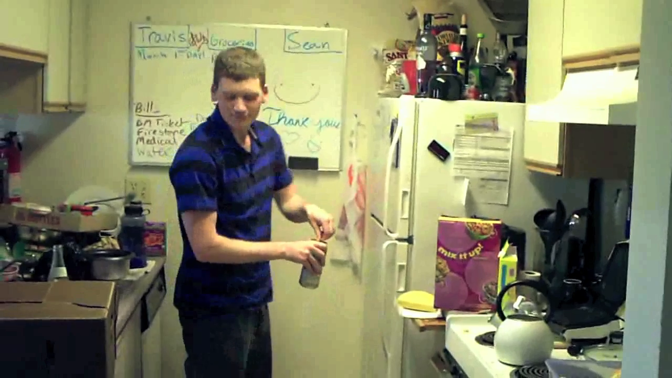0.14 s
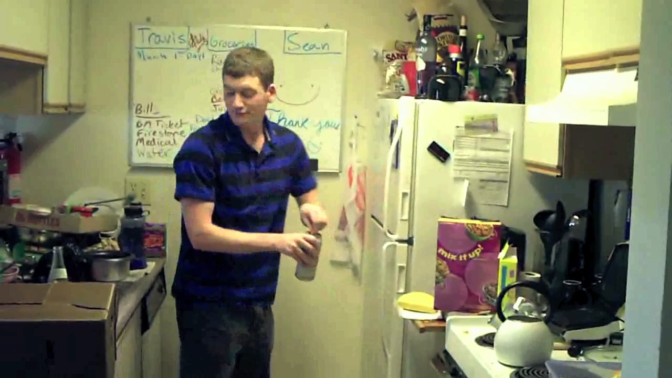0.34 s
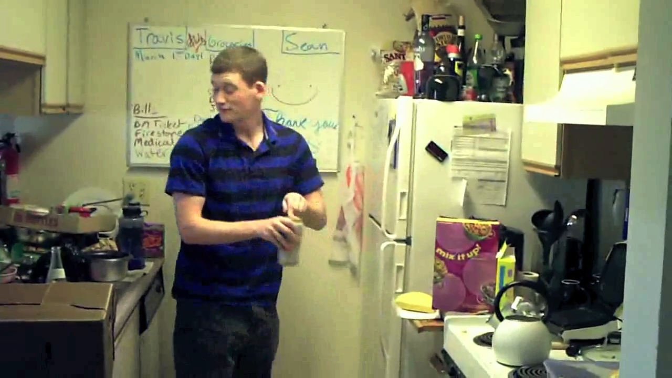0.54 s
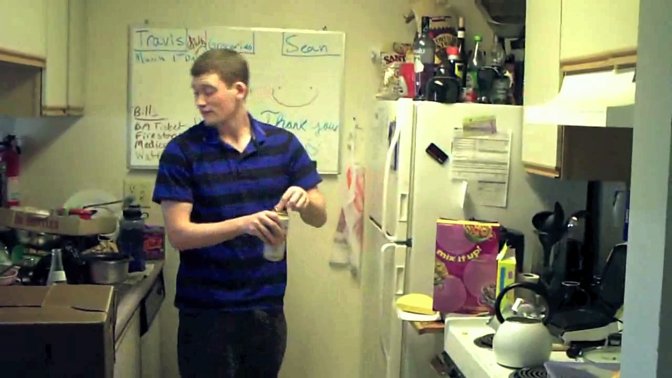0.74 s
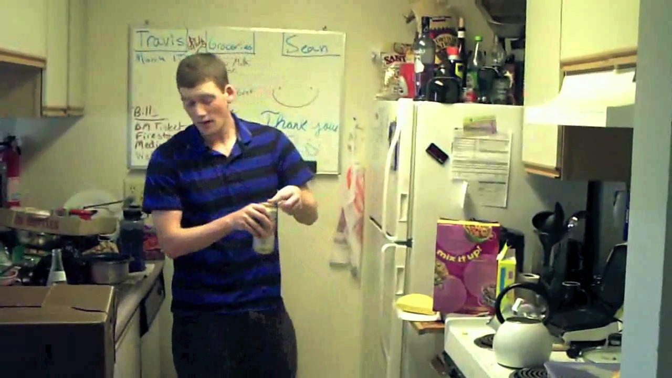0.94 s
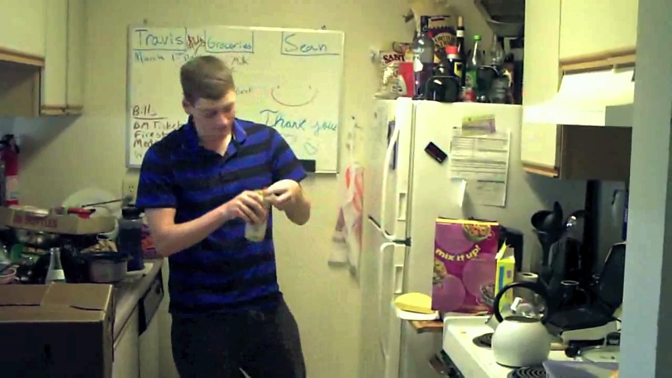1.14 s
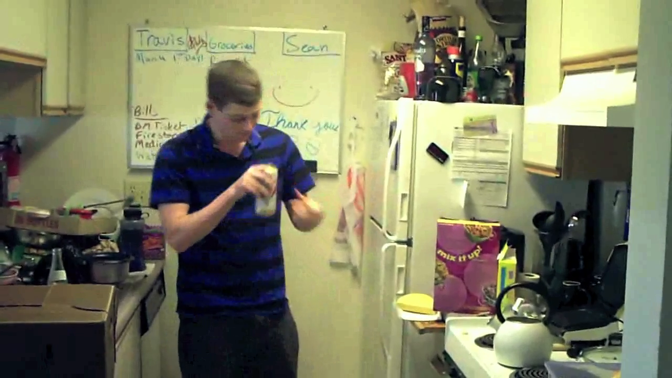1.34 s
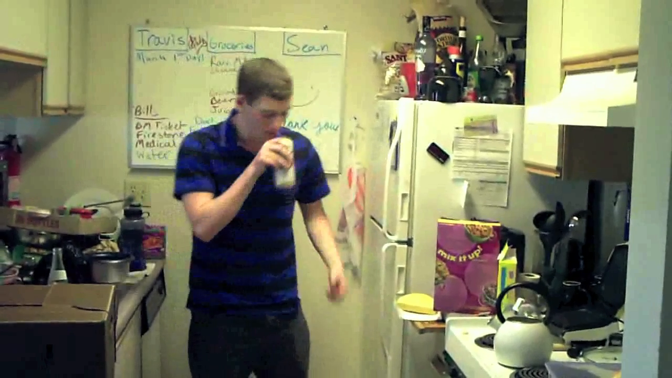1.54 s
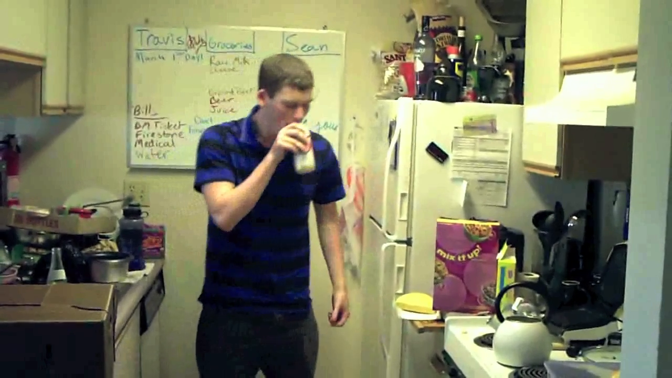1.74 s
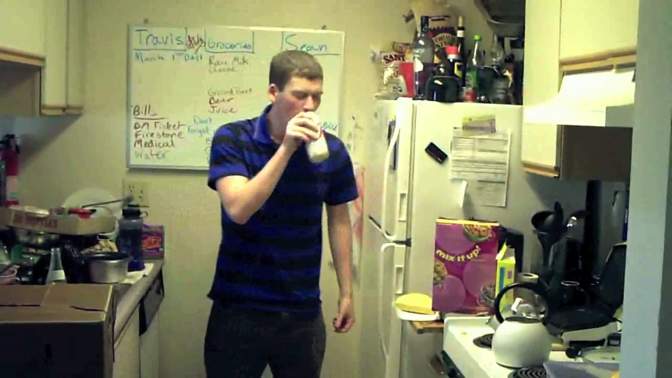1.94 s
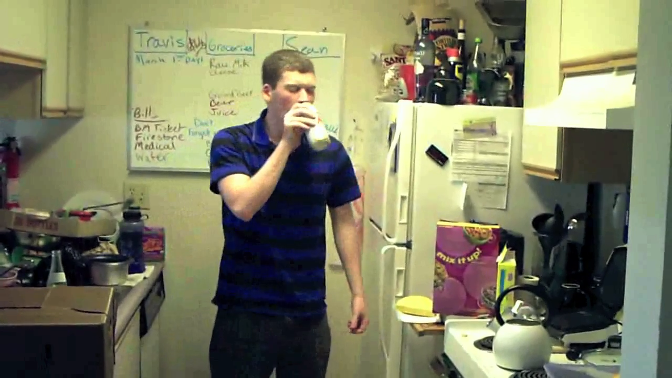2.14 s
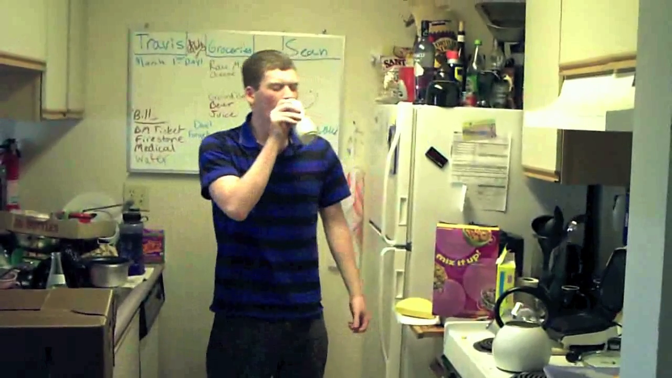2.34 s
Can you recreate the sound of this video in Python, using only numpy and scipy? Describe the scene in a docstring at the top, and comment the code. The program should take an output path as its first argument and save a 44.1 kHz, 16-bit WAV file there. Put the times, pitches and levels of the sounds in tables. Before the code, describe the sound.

A drink can is opened in a small kitchen: the tab ticks, then the lid cracks with a puff of gas and faint fizz. A few soft steps knock and creak over a humming fridge, on a small microphone.

```python
"""The tab of a drink can ticks over a humming fridge in a small kitchen. The lid tears open with a puff
of gas and a hollow ring, the tab is pushed home and tiny bubbles fizz. A few steps knock, thump and
creak on the floor, and a deep rumble swells now and then. The small microphone rings near 4.5 kHz,
has little treble and overloads on the burst."""
import sys
import numpy as np
from scipy import signal
from scipy.fft import rfft, irfft, next_fast_len
from scipy.io import wavfile
from scipy.ndimage import uniform_filter1d

SR = 44100
rng = np.random.default_rng(int(sys.argv[2]) if len(sys.argv) > 2 else 0)


def materialize(psi):
    """Save the field psi as 16-bit PCM at rate SR to the path in sys.argv[1].

    A 1-D psi becomes a single channel; in a 2-D psi each row is a channel.
    """
    bounded = np.clip(np.atleast_2d(psi).T, -1, 1)
    quanta = np.round(bounded * 32767).astype(np.int16)
    wavfile.write(sys.argv[1], SR, quanta)


N = 110250
T = np.arange(N) / SR


def undb(db):
    return 10 ** (np.asarray(db) / 20)


def unit_rms(x):
    return x / np.sqrt(np.mean(x ** 2))


def per_khz(x):
    """Scales white noise of power 1 to power 1 per kHz."""
    return x * np.sqrt(SR / 2000)


def colour(x, points):
    """Minimum-phase filter through (Hz, dB) points."""
    hz, db = np.array(points, float).T
    size = 2 * next_fast_len(len(x))
    bins_hz = np.maximum(np.arange(size // 2 + 1) * SR / size, 1)
    gain = undb(np.interp(np.log(bins_hz), np.log(hz), db))
    cepstrum = irfft(np.log(gain))
    cepstrum[1:size // 2] *= 2
    cepstrum[size // 2 + 1:] = 0
    return irfft(rfft(x, size) * np.exp(rfft(cepstrum)))[:len(x)]


def whiten(x, smooth_hz=160):
    """Flattens broad spectral humps; energy 1."""
    power = np.abs(rfft(x)) ** 2
    power = uniform_filter1d(power, int(smooth_hz * len(x) / SR) + 1) + 1e-9 * power.mean()
    flat = colour(x, np.c_[np.linspace(1, SR / 2, len(power)), -10 * np.log10(power)])
    return flat / np.sqrt(np.sum(flat ** 2))


def ring(x, hz, width_hz):
    """One resonance, gain 1 at its centre."""
    return signal.lfilter(*signal.iirpeak(hz, hz / width_hz, fs=SR), x)


def resonate(x, modes):
    return sum(undb(db) * ring(x, hz, width_hz) for hz, width_hz, db in modes)


def narrow_noise(hz, width_hz, widen=1):
    """Noise through two resonances in series; RMS 1."""
    band = ring(rng.standard_normal(N), hz, width_hz)
    return unit_rms(ring(band, hz, widen * width_hz))


def fade(start_s, t60_s):
    """Sudden onset, exponential decay."""
    return (T >= start_s) * np.exp(-np.log(1000) * np.maximum(T - start_s, 0) / t60_s)


def swell(start_s, length_s):
    """Rounded rise and fall."""
    progress = np.clip((T - start_s) / length_s, 0, 1)
    return np.sqrt(np.abs(np.sin(np.pi * progress)))


def contact(start_s, length_s, size=8192):
    """Brief rattle falling 30 dB over length_s; energy of 30 ms at power 1 per kHz."""
    rattle = whiten(rng.standard_normal(size) * fade(0, 2 * length_s)[:size])
    placed = np.r_[np.zeros(int(start_s * SR)), rattle, np.zeros(N)][:N]
    return per_khz(placed * np.sqrt(.03 * SR))


def kitchen(x, early_db=1.5, early_t60_s=.073, tail_db=-3.5, tail_t60_s=.32, size=32768):
    """Direct sound, quick echoes off cupboards and walls, and a short tail."""
    response = np.zeros(size)
    response[0] = 1
    for db, t60_s in ((early_db, early_t60_s), (tail_db, tail_t60_s)):
        echoes = rng.standard_normal(size) * fade(start_s=.001, t60_s=t60_s)[:size]
        response += undb(db) * whiten(echoes)
    return signal.fftconvolve(x, whiten(response))[:N]


# Fridge hum. Each row: centre in Hz, width in Hz, level in dB.
HUM_LINES = [(55.7, 6, -60.5), (118.9, 6, -63), (213.4, 24, -57), (262.4, 10, -66), (310, 12, -59),
             (725, 10, -67.5), (830, 12, -58.5)]

def fridge(whine_hz=2333, wobble_hz=5, whine_db=-65):
    """Wavering hum lines and a thin, wobbling whine."""
    hum = sum(undb(db) * narrow_noise(hz, width_hz) for hz, width_hz, db in HUM_LINES)
    pitch_hz = whine_hz + wobble_hz * narrow_noise(hz=10, width_hz=20)
    phase = 2 * np.pi * np.cumsum(pitch_hz) / SR
    return hum + undb(whine_db) * np.sqrt(2) * np.sin(phase)


# Kitchen air. Each row: frequency in Hz, level in dB per kHz.
AIR_SPECTRUM = [(8, -34.5), (17, -23.5), (30, -40), (55, -41), (80, -50), (115, -45), (160, -50),
                (215, -42.5), (310, -44), (400, -49.5), (500, -52.5), (650, -50.5), (830, -49),
                (1050, -51.5), (1350, -53), (1800, -58), (2400, -62.5), (2750, -66), (3500, -69),
                (4500, -76), (7000, -76.5)]

def room_air():
    """Steady low rush of the room."""
    return colour(per_khz(rng.standard_normal(N)), AIR_SPECTRUM)


# Ticks on the lid. Each row: start in seconds, level in dB, length in seconds, relative ring in dB.
TAB_TICKS = [(0.001, -54, .04, -18.5), (0.094, -61.5, .004, -17), (0.1264, -51, .006, -16.5),
             (0.1337, -41.5, 0.024, 9), (0.14, -52, 0.017, 16), (0.168, -45, 0.013, -5),
             (0.1767, -36.5, 0.027, -10.5), (0.185, -45.5, .006, 10), (0.1906, -48, .01, -3),
             (0.373, -67.5, .004, -5.5), (0.426, -59, .008, -6.5), (0.627, -62, 0.041, -8),
             (0.907, -67, 0.033, -10), (0.9313, -56, 0.011, -10.5), (0.9367, -49.5, 0.0074, -13),
             (0.9429, -51, .012, -7.5), (0.952, -63.5, .02, -7.5), (1.551, -72, 0.0096, -5),
             (1.629, -62.5, 0.035, -14.5), (1.9974, -70.5, 0.0041, -2), (2.137, -71.5, 0.018, 9)]
# Tick spectrum. Each row: frequency in Hz, gain in dB.
TICK_EQ = [(100, -13.5), (500, -10), (1100, -5), (2000, -5), (3500, -4), (4500, -0.5), (5600, 0),
           (7000, -0.5)]
# Lower ring of the lid. Each row: centre in Hz, width in Hz, gain in dB.
LID_RESONANCES = [(2220, 110, -4), (3010, 57, 3.5), (3300, 150, 2)]

def tab():
    """Tab and fingers tick on the lid; some ticks bring out its lower ring."""
    ticks, lid_drive = 0, 0
    for start_s, db, length_s, ring_db in TAB_TICKS:
        tick = undb(db) * contact(start_s, length_s)
        ticks += tick
        lid_drive += undb(ring_db) * tick
    return colour(ticks, TICK_EQ) + resonate(lid_drive, LID_RESONANCES)


# Steps and scuffs. Each row: start in seconds, level in dB, length in seconds,
# relative click in dB, relative thump in dB.
FOOT_CONTACTS = [(0.002, -47, 0.13, -5, 7), (0.582, -48.5, .012, -6.5, -3), (0.596, -52, .02, -8, 8),
                 (1.2849, -36, 0.0066, 4.5, 0), (1.2879, -50, 0.018, 5, 10),
                 (1.295, -45.5, 0.014, 2.5, -13.5), (1.312, -43.5, .04, -0.5, 6.5),
                 (1.3553, -45.5, 0.0076, -13, 3), (1.3573, -43, 0.0071, -0.5, -15),
                 (1.366, -36, 0.013, -15.5, -16), (2.1628, -39, 0.0096, 2, -6),
                 (2.168, -39.5, 0.023, -5.5, 5), (2.175, -42.5, 0.018, -16, -0.5),
                 (2.196, -53.5, .01, -11, 25.5), (2.472, -54, 0.012, -8.5, 5.5)]
# Knock, click and thump spectra. Each row: frequency in Hz, gain in dB.
KNOCK_EQ = [(40, 0), (110, 5), (190, -3.5), (270, 1.5), (400, -0.5), (580, -1.5), (900, 2), (1200, -2),
            (1600, -6), (2050, -4), (2600, -13.5), (3400, -15.5), (7000, -31)]
CLICK_EQ = [(300, -24.5), (1500, -21), (3000, -15), (4500, -17), (7000, -12.5)]
THUMP_EQ = [(15, -0.5), (45, 5.5), (62, 8.5), (85, -4), (115, 2.5), (170, -12), (400, -28.5), (2000, -57)]
# Ring of the floor. Each row: centre in Hz, width in Hz, gain in dB.
FLOOR_RESONANCES = [(400, 13, 3.5), (810, 24, -2.5), (873, 19, 4.5), (987, 45, -6.5)]

def steps(thump_s=.023):
    """A woody knock and a click echo in the room; the thump comes through the floor."""
    knock, click, thump = 0, 0, 0
    for start_s, db, length_s, click_db, thump_db in FOOT_CONTACTS:
        knock += undb(db) * contact(start_s, length_s)
        click += undb(db + click_db) * contact(start_s, length_s)
        thump += undb(db + thump_db) * contact(start_s, thump_s)
    wood = colour(knock, KNOCK_EQ) + resonate(knock, FLOOR_RESONANCES)
    return kitchen(wood + colour(click, CLICK_EQ)) + colour(thump, THUMP_EQ)


# Crackle envelope. Each row: time in seconds, level in dB.
FIZZ_LEVELS = [(0, -92), (.12, -59.5), (.21, -70), (.26, -46), (.32, -63), (.38, -60), (.5, -70),
               (.57, -80.5), (.61, -62.5), (.68, -87), (.83, -76), (.91, -66), (.99, -62.5), (1.06, -63),
               (1.2, -74.5), (1.45, -68), (1.6, -76), (1.75, -84), (2.5, -83)]
# Crackle spectrum. Each row: frequency in Hz, gain in dB.
FIZZ_EQ = [(300, -21), (2000, -11.5), (3500, -4), (4500, 1.5), (5600, 1), (7000, 1)]

def fizz(pops_per_s=2500, spread_db=2.5):
    """Fine crackle at the can: fingers on the metal, then tiny bubbles."""
    pops = (rng.random(N) < pops_per_s / SR) * rng.standard_normal(N)
    pops *= undb(spread_db * rng.standard_normal(N))
    envelope = undb(np.interp(T, *np.array(FIZZ_LEVELS).T))
    return colour(per_khz(unit_rms(pops)) * envelope, FIZZ_EQ)


# Bass swells. Each row: start in seconds, length in seconds, level in dB.
RUMBLE_SWELLS = [(0.149, 0.031, -37), (0.73, 0.19, -41), (1.889, 0.15, -36.5)]

def rumble():
    """The deepest bass swells softly now and then."""
    envelope = sum(undb(db) * swell(start_s, length_s) for start_s, length_s, db in RUMBLE_SWELLS)
    return narrow_noise(hz=23, width_hz=18) * envelope


# Jerks of the tearing lid. Each row: start in seconds, level in dB, length in seconds.
LID_TEARS = [(0.2092, -20, .012), (0.2137, -24.5, 0.019), (0.217, -31.5, .008), (0.2261, -28.5, .005),
             (0.2279, -28, .003)]
# Spectrum of tear and gas. Each row: frequency in Hz, gain in dB.
BURST_EQ = [(40, -8), (110, -8.5), (250, -7), (400, -10.5), (550, -8), (800, -4), (1100, -1), (1500, 1.5),
            (1850, 2), (2300, -0.5), (2800, -5), (3500, 4), (4500, 1), (5600, 0), (7000, 4.5)]
# Ring of the can. Each row: centre in Hz, width in Hz, gain in dB.
CAN_RESONANCES = [(1075, 25, -3.5), (1256, 60, -2), (1440, 24, 4.5), (1550, 39, 3)]

def lid_burst(gas_start_s=.23, gas_db=-42.5, gas_t60_s=.25):
    """The lid tears along its score, the can rings hollow and gas escapes."""
    tear = sum(undb(db) * contact(start_s, length_s) for start_s, db, length_s in LID_TEARS)
    gas = undb(gas_db) * per_khz(rng.standard_normal(N)) * fade(gas_start_s, gas_t60_s)
    return colour(tear + gas, BURST_EQ) + resonate(tear, CAN_RESONANCES)


# Creaks. Each row: start in seconds, length in seconds, centre in Hz, width in Hz, level in dB.
FLOOR_CREAKS = [(1.245, 0.035, 1800, 200, -44.5), (1.349, 0.018, 1970, 507, -31.5),
                (2.216, 0.0438, 2020, 675, -44.5)]

def creaks():
    """Short rubs in the floor, each sounding one resonance."""
    return sum(undb(db) * narrow_noise(hz, width_hz, widen=2) * swell(start_s, length_s)
               for start_s, length_s, hz, width_hz, db in FLOOR_CREAKS)


def scene():
    """Can and floor over the kitchen's background, in mono."""
    background = fridge() + room_air() + rumble()
    can = kitchen(tab() + fizz()) + kitchen(lid_burst())
    floor = steps() + kitchen(creaks())
    return (background + can + floor)[None]


# Microphone response. Each row: frequency in Hz, gain in dB.
MIC_EQ = [(2000, -0.5), (3500, -1), (3950, 4.5), (4300, 10), (4550, 13.5), (4820, 10.5), (5100, 5.5),
          (5550, -4.5), (6200, -4.5), (6700, -18.5), (7100, -35), (7800, -54.5), (9000, -70)]

def record(dry, drive_db=-.5, ceiling=.59, knee=12, lowpass_hz=15900):
    """The microphone rings and dulls the sound; its amplifier flattens the loudest peaks."""
    driven = undb(drive_db) * colour(dry[0], MIC_EQ)
    clipped = driven / (4 + np.abs(driven / ceiling) ** knee) ** (1 / knee)
    lowpass = signal.ellip(8, .2, 80, lowpass_hz, fs=SR, output="sos")
    return signal.sosfilt(lowpass, clipped)[None]


dry = scene()
out = record(dry)
materialize(out)
```